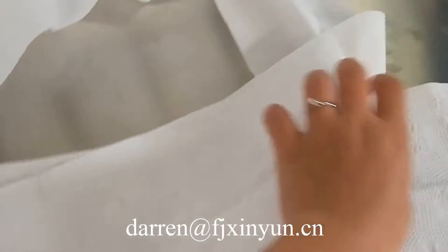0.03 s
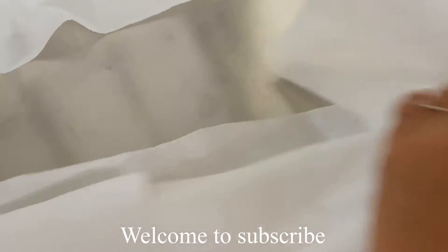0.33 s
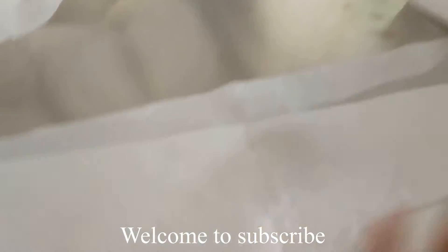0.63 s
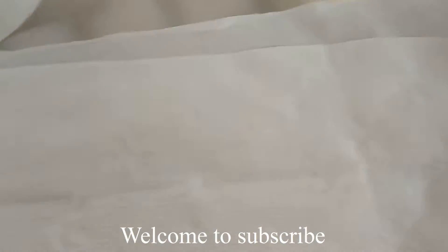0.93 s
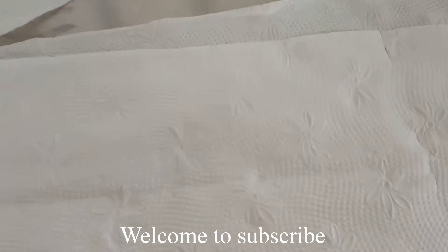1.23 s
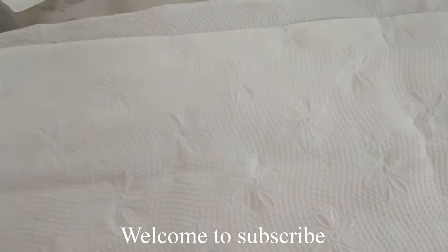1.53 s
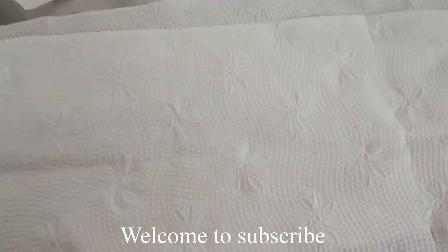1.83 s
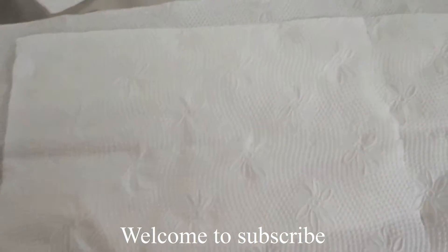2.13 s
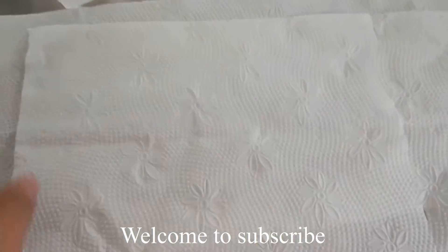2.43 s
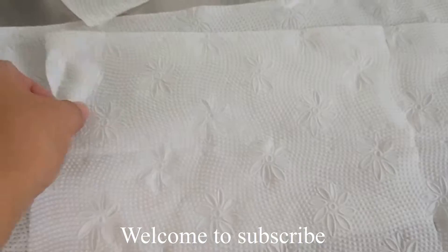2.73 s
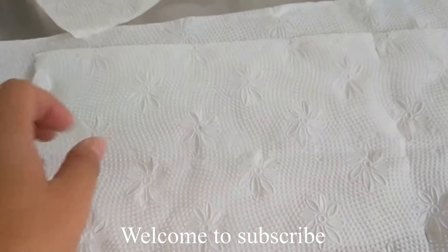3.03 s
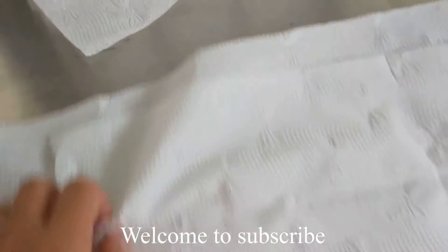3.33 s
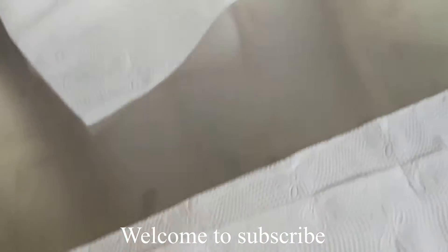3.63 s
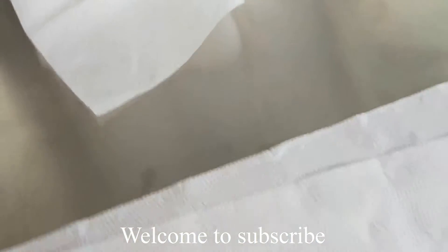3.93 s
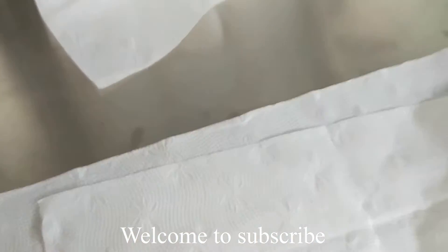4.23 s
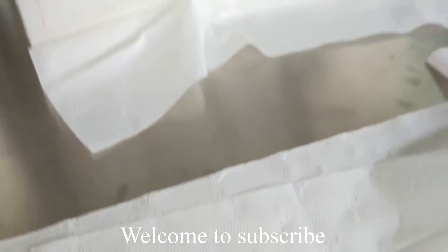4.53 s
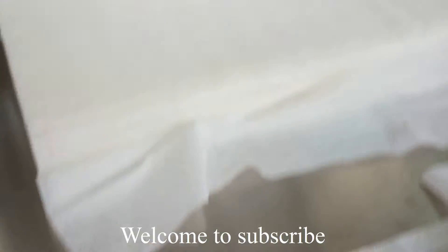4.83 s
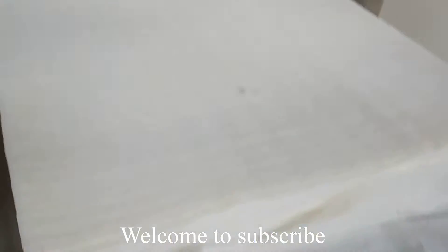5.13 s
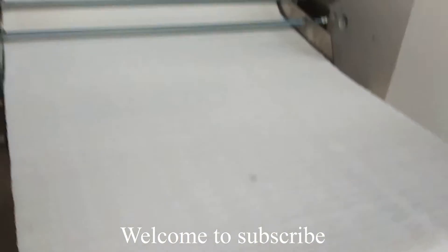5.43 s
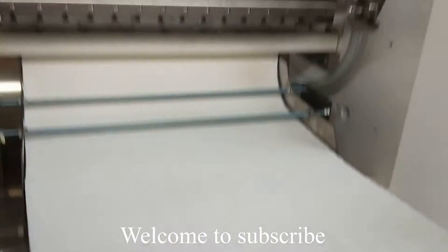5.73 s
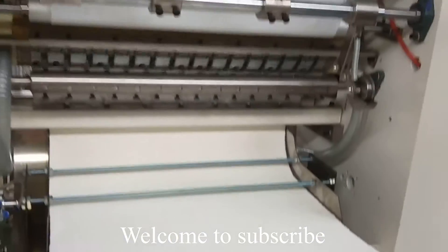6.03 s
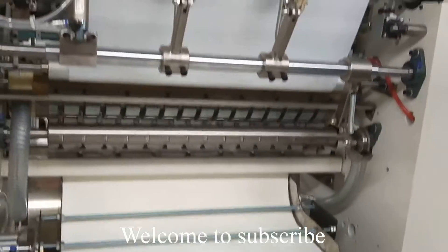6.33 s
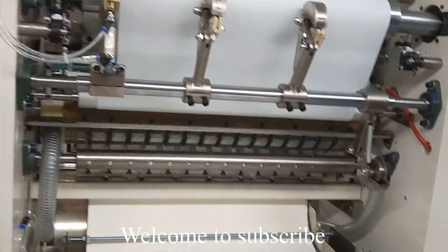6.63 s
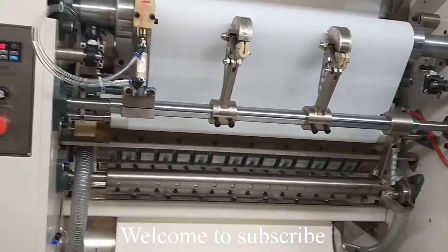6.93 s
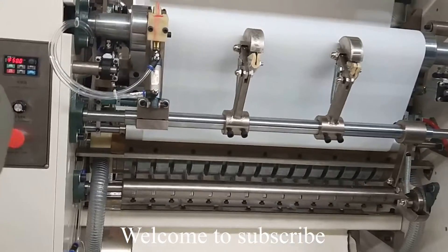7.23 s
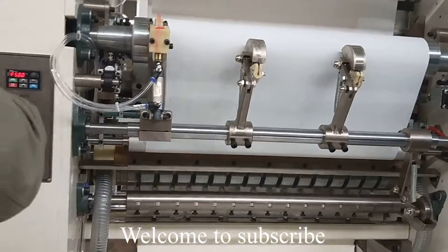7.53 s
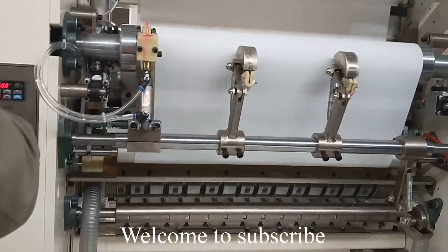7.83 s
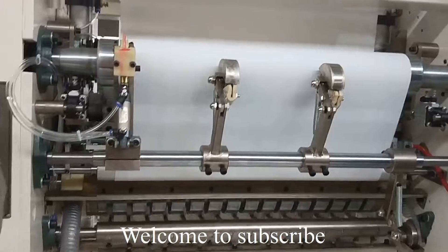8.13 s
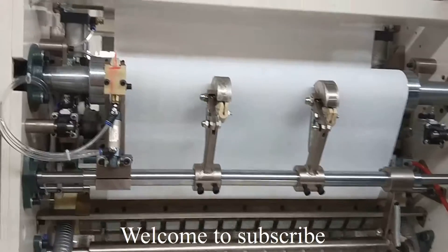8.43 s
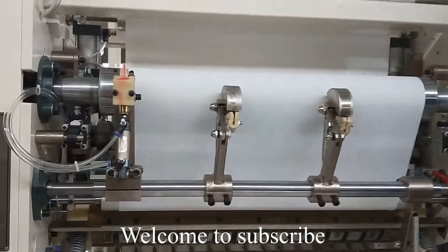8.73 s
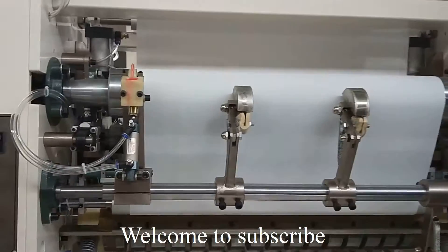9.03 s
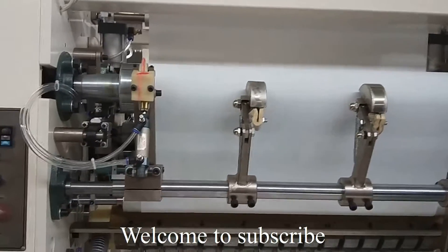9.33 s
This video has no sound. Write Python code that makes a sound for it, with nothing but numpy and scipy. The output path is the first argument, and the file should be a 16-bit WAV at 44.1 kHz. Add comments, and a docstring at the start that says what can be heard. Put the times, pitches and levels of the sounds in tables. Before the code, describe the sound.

A tissue folding machine runs steadily in a factory hall, its rollers giving rapid metal knocks and high pulsing squeals while paper slaps and drags in a slower rhythm. Hollow thuds and a low drone sit underneath. An air jet hisses on the left, then fades as the microphone moves from the paper stack to the rollers. There, ticks, brief scrapes and growing hiss and rustle take over.

```python
"""A tissue folding machine runs in a factory hall. From the start each roller turn gives two metal
knocks and a squeal, while a slower stroke slaps and drags the paper web and the frame thuds hollowly.
By 2.5 s the microphone is at the paper stack, an air jet hissing on the left. By 5.6 s it has moved
to the rollers, where the bracket ticks and the drag sounds lower. The jet then fades; brief scrapes
ring, and roller hiss and web rustle grow to the end."""
import sys
import numpy as np
from scipy import signal
from scipy.fft import rfft, irfft, next_fast_len
from scipy.io import wavfile
from scipy.ndimage import uniform_filter1d, map_coordinates

SR = 44100
rng = np.random.default_rng(int(sys.argv[2]) if len(sys.argv) > 2 else 0)


def generate_wav(sig):
    """Save sig (samples, or channels by samples) to the path in sys.argv[1] as 16-bit PCM at SR."""
    pcm = np.round(np.clip(np.atleast_2d(sig).T, -1, 1) * 32767).astype(np.int16)
    wavfile.write(sys.argv[1], SR, pcm)


N = 418068
TIME_S = np.arange(N) / SR
TURN_HZ = 8.945
CREST_S = 1 / 20  # start of a tone burst to its crest

# Hard rub: t/s, level/dB, L-R/dB
SQUEAL = [(0.1, -26.5, -31), (0.39, -17, -2), (0.62, -16, -4), (0.73, -22.5, -11), (0.84, -24.5, -16),
          (1.06, -18.5, -2), (1.18, -19, 2), (1.73, -23, 8), (1.92, -34, 0), (2.1, -16, 11),
          (2.41, -15.5, -4.5), (2.97, -21, 3), (3.08, -21.5, 3), (3.2, -16, 1), (3.63, -22.5, 5),
          (3.75, -15, -8), (3.97, -16, -5), (4.08, -14.5, -5), (4.2, -19, -4), (4.31, -25.5, -10),
          (4.72, -32, 8), (4.86, -24.5, 13), (4.98, -23.5, 10), (5.09, -18.5, 6), (5.2, -37, -7),
          (5.35, -14.5, 15), (5.54, -24, 1), (5.76, -18, -6), (5.98, -20, -3), (6.1, -15.5, 0),
          (6.43, -23, -6), (6.54, -23, -10), (6.77, -27, -11), (6.88, -22, 1), (6.99, -25.5, 2),
          (7.21, -22, 1), (7.44, -27, -8), (7.55, -24.5, -15), (7.7, -28.5, 0), (8, -30, 8),
          (8.33, -26.5, -10), (8.44, -19.5, -8), (8.55, -23.5, -10), (8.7, -15.5, -19), (8.89, -26.5, 1),
          (9, -22, -4), (9.11, -18, -4), (9.23, -21.5, -7), (9.45, -20.5, -2)]
# Light rubs: delay/s, level/dB re hard rub
LIGHT_RUBS = [(.034, -16.5), (.056, -7.5), (.08, -17)]
# Higher chirp: t/s, level/dB
CHIRP = [(0.04, -31), (0.49, -43), (1.16, -30.5), (1.72, -44), (2.16, -29), (3.2, -31.5), (4.1, -39.5),
         (4.96, -37), (5.97, -43), (7.3, -54), (7.6, -43), (9.32, -37)]
def squeals():
    """Each turn the roller chirps, rubs once hard, then three times lightly."""
    out = np.zeros((2, N))
    times = turns(first_s=.0595)
    for s, scatter in zip(times, rng.standard_normal((len(times), 5))):
        pitch, stretch, light_pitch, light_db, chirp_db = scatter
        db, pan_db = curves(SQUEAL, s)
        start_s = s - CREST_S
        width_s = .007 * np.exp(.08 * stretch)
        hard = tone_burst(5234 + 12 * pitch, width_s, overtone_db=-32, spread_rad=.83, glide_per_s=.49)
        add(out, start_s, amp(db) * sides(pan_db) * rough(hard, swing_db=.7))
        for delay_s, rub_db in LIGHT_RUBS:
            light = tone_burst(5230 + 26 * light_pitch, width_s=.0056, overtone_db=-28, spread_rad=1)
            add(out, start_s + delay_s, amp(db + rub_db + light_db) * sides(pan_db) * light)
        chirp = tone_burst(5722 + 15 * pitch, width_s=.0057, overtone_db=-52, spread_rad=.98)
        add(out, start_s - .02, amp(curve(CHIRP, s) + 1.5 + chirp_db) * sides(pan_db=37) * chirp)
    return out


# Lower knock: t/s, level/dB, L-R/dB
LOW_BLOWS = [(0.02, -21, 31), (1.25, -24.5, 0), (1.36, -25, -1), (1.48, -31, 10), (1.7, -27.5, 19),
             (2.03, -26.5, 0), (2.15, -20.5, 19), (4.4, -16.5, 6.5), (4.94, -22, 0), (5.5, -34, -3),
             (5.61, -28.5, -5), (9.41, -17.5, -9)]
# Resonances of the part and its bracket: f/Hz, width/Hz, level/dB
LOW_RING = [(1213, 68, 9.5), (1610, 200, -24.5)]
BRACKET_RING = [(2280, 29, -5), (3320, 260, -39), (1640, 480, -12)]
NEAR_LEAD_S = .0026  # knocks arrive sooner at the rollers
def low_knocks():
    """A metal part strikes and rebounds once a turn; close by, its bracket rings too."""
    blows, t = np.zeros((2, N)), np.arange(SR // 10) / SR
    blow = (1 - np.exp(-(t / .007) ** 2)) * np.exp(-t / .0054)
    for s in turns(first_s=.022):
        db, pan_db = curves(LOW_BLOWS, s)
        hit = amp(db + 2.5 * rng.standard_normal()) * sides(pan_db) * blow
        arrival_s = s - NEAR_LEAD_S * nearness(s)
        add(blows, arrival_s, hit)
        add(blows, arrival_s + .017, .1 * hit)
    bracket = amp(-14.5 + 17.5 * nearness()) * even(ringing(BRACKET_RING, apart=.75))
    part = amp(6.5 + 3.4 * nearness()) * even(ringing(LOW_RING, apart=.68))
    return blows * (part + bracket)


# Higher knock: t/s, level/dB, L-R/dB
HIGH_BLOWS = [(0.08, -25, 9), (1.98, -28.5, -2), (2.09, -25, -18), (2.2, -38, -14), (2.65, -23.5, 16),
              (4.66, -28, 2), (4.89, -64, -2), (5.11, -33, 14), (6.23, -37, -27), (6.34, -27, -19),
              (6.68, -27.5, -15), (6.92, -26, -10), (7.13, -21.5, -3), (7.24, -33, -2), (7.35, -23, -10),
              (7.8, -22.5, -7), (8.13, -18.5, -6), (8.24, -23, -10), (8.6, -17, -5), (9.36, -27, -10)]
# Steel part: f/Hz, level/dB, t60/s
HIGH_MODES = [(1873, 1, 0.044), (3774, -23.5, 0.043)]
# Blow and rebounds: delay/s, level/dB
CHATTER = [(0, 0), (0.009, 0.5), (0.024, -7.5)]
# Clinks: t/s, level/dB, L-R/dB
CLINKS = [(6.727, -23.5, -22), (6.932, -20.5, -30), (7.687, -52, 20), (8.539, -21.5, -21), (8.743, -21, -4),
          (8.942, -24.5, -4)]
def high_knocks():
    """A small steel part chatters on its stop once a turn and clinks when a stroke catches it."""
    out = np.zeros((2, N))
    for s in turns(first_s=.081):
        db, pan_db = curves(HIGH_BLOWS, s)
        near = nearness(s)
        for delay_s, hit_db in CHATTER:
            ring = rough(struck(HIGH_MODES, attack_s=.0045, spread_rad=.8, detune=.012))
            arrival_s = s + delay_s * (1 + .16 * rng.standard_normal()) - NEAR_LEAD_S * near
            add(out, arrival_s, amp(db + hit_db + 5 + .5 * near) * sides(pan_db) * ring)
    for s, db, pan_db in CLINKS:
        clink = tone_burst(HIGH_MODES[0][0], width_s=.004, overtone_db=-28, spread_rad=.6)
        add(out, s - CREST_S, amp(db) * sides(pan_db) * clink)
    return out


# Struck bracket: f/Hz, level/dB, t60/s
BRACKET_MODES = [(2333, -0.5, 0.036), (3660, -35, 0.017)]
def ticks(blows, first_s, gain_db):
    """Each knock ticks the bracket, audible close to the rollers."""
    out = np.zeros((2, N))
    for s in turns(first_s):
        db, pan_db = curves(blows, s)
        tick = struck(BRACKET_MODES, attack_s=.002, spread_rad=.6, detune=.008)
        add(out, s, amp(db + gain_db - 33 * (1 - nearness(s))) * sides(pan_db) * tick)
    return out


def metal(lag_s=.0001):
    """Both knocks, reaching the left ear lag_s after the right, plus their ticks."""
    delay_s = np.array([[.5], [-.5]]) * lag_s
    knocks = filtered(low_knocks() + high_knocks(), lambda hz: np.exp(-2j * np.pi * hz * delay_s))
    low_ticks = ticks(LOW_BLOWS, first_s=.0236, gain_db=-2)
    high_ticks = ticks(HIGH_BLOWS, first_s=.079, gain_db=5.5)
    return knocks + low_ticks + high_ticks


# Folding strokes, five a second: t/s, slap/dB, drag/dB, edge/dB
STROKES = [(0.074, -17, -27, -21), (0.276, -31, -29, -23), (0.478, -17, -31, -15), (0.68, -33.0, -34, -21),
           (0.881, -23.5, -36, -20), (1.083, -17.5, -27, -15), (1.285, -29, -28.5, -18.5),
           (1.487, -26.5, -48, -20), (1.689, -21.5, -45, -16), (1.891, -23.5, -35, -24.5),
           (2.092, -18.5, -39, -18.5), (2.294, -21, -42, -23.5), (2.496, -20, -32, -20.5),
           (2.698, -25, -36.5, -22.5), (2.9, -23, -38, -23.5), (3.102, -21, -31.5, -24.0),
           (3.304, -18.5, -43, -21.5), (3.505, -19, -35, -22), (3.707, -18.5, -24, -16.5),
           (3.909, -18, -29, -17.5), (4.111, -20.5, -46, -18.5), (4.313, -21.5, -29, -21),
           (4.515, -22.5, -34.5, -25), (4.717, -26, -50, -33), (4.918, -21, -35.5, -31),
           (5.12, -19, -26.5, -23), (5.322, -20, -28, -24.5), (5.524, -14, -32, -22.5),
           (5.726, -16, -29.5, -21), (5.928, -15.5, -35, -22.5), (6.13, -21.5, -31.5, -26.5),
           (6.331, -22.5, -25, -24), (6.533, -40, -29, -25), (6.735, -40.0, -24, -27),
           (6.937, -45, -27.5, -27), (7.139, -52.0, -28.5, -35), (7.341, -40.0, -28, -24),
           (7.542, -26, -29.5, -23), (7.744, -26, -29, -18.5), (7.946, -20.5, -21.5, -24),
           (8.148, -28, -31.5, -43), (8.35, -33, -33.5, -32), (8.552, -32, -26.5, -28.5),
           (8.754, -28, -34, -31), (8.955, -28.5, -44, -41), (9.157, -20.5, -31.5, -18.5),
           (9.359, -22, -23.5, -26)]
# Paper position: t/s, body L-R/dB, crisp L-R/dB
PAPER_PAN = [(0, -13, 5), (.6, 7.5, -3), (2.3, -1.5, -7.5), (3.2, 12, -0.5), (3.9, -6, 0), (4.6, 14, 2.5),
             (5, -1.5, 2), (5.9, -2.5, -9), (6.35, 11, 15), (7, -5, 3), (7.5, 5, 7), (9.1, -6, 7.5)]
# Slap and drag resonances, heard at stack and rollers: f/Hz, width/Hz, level/dB
STACK_SLAP = [(288, 63, -24), (667, 25, -1), (1004, 48, 1.5), (1182, 155, 22), (1740, 77, -9),
              (1040, 2200, -14)]
NEAR_SLAP = [(689, 67, -1), (921, 120, 5.5), (1170, 140, -1), (1542, 85, -3), (1100, 900, -22)]
STACK_DRAG = [(725, 46, -32), (867, 67, 0.5), (992, 60, 8.5), (1120, 30, 2), (1750, 71, 0), (2820, 200, -6),
              (1100, 2000, -28)]
NEAR_DRAG = [(416, 66, -0.5), (528, 120, 4), (660, 116, 16.5), (815, 43, 12.5), (1310, 46, -7),
             (3300, 19, -11), (1300, 5300, -25)]
# Crisp paper edge: f/Hz, density/dB
EDGE_SPECTRUM = [(900, -13.5), (1400, -10), (1700, 4.5), (1860, 9.5), (2100, -2), (2340, -10), (2600, -5.5),
                 (2900, -3), (3120, -30), (3350, -12), (4200, -26.5), (7000, -26), (12000, -46)]
def folds():
    """Each stroke draws the flapping web in, slaps it down and drags it over the stack."""
    slap, drag, edge = np.zeros((3, N))
    lead_s = .1
    t = np.arange(SR // 3) / SR - lead_s
    blow = lambda decay_s: np.exp(-np.maximum(t, 0) / decay_s) / (1 + np.exp(-t / .0073))
    for s, slap_db, drag_db, edge_db in STROKES:
        near = nearness(s)
        draw = amp(-40.5 - .5 * near) * swell(t + .068, width_s=.024)
        slide = amp(drag_db) * swell(t - .043 + .0023 * near, width_s=.018)
        add(slap, s - lead_s, amp(slap_db) * blow(decay_s=.007))
        add(drag, s - lead_s, draw + slide)
        add(edge, s - lead_s, amp(edge_db) * (blow(decay_s=.018) + .16 * swell(t + .022, width_s=.0089)))
    at_stack, at_rollers = np.sqrt(1 - nearness()), np.sqrt(nearness())
    drag_ring = at_stack * ringing(STACK_DRAG, apart=1, grain_db=4.5)
    drag_ring += at_rollers * ringing(NEAR_DRAG, apart=.74, grain_db=11)
    slap_ring = at_stack * ringing(STACK_SLAP, apart=1) + at_rollers * ringing(NEAR_SLAP, apart=1)
    body_pan_db, crisp_pan_db = curves(PAPER_PAN)
    body = sides(body_pan_db) * (slap * even(slap_ring) + drag * even(drag_ring))
    crisp = sides(crisp_pan_db) * edge * noise(EDGE_SPECTRUM, alike=.015, grain_db=2, patchy_db=10.5)
    flutter = unit(amp(2.2 * wobble(130)))
    return flutter * (body + crisp)


# Feed table and its steel sheets: f/Hz, level/dB, t60/s
TABLE_MODES = [(923, -0.5, 0.044), (840, -5, 0.028), (651, -21, 0.2), (1360, -10, 0.12)]
SHEET_MODES = [(915, 0, 0.26), (982, 0, 0.3), (1620, -10, 0.18), (1885, -7, 0.24)]
def feed_table():
    """Table and sheets ring on after each slap; the shifting pile detunes them."""
    out = np.zeros((2, N))
    for s, slap_db, drag_db, _ in STROKES:
        near = nearness(s)
        pan_db, _ = curves(PAPER_PAN, s)
        table = struck(TABLE_MODES, attack_s=.017, spread_rad=.75, detune=.035)
        sheets = rough(struck(SHEET_MODES, attack_s=.006, spread_rad=.7, detune=.012))
        ring = amp(drag_db + 1 + 6.5 * near) * table + amp(slap_db - 14 + 1.5 * near) * sheets
        add(out, s, sides(pan_db) * ring)
    return out


# Feed table notes: t/s, level/dB, f/Hz, length/s
HOLLOW_NOTES = [(1.135, -24, 920, 0.017), (1.301, -28, 985, 0.022), (1.335, -27.5, 865, 0.015),
                (3.922, -21.5, 930, 0.016), (3.94, -23, 1156, 0.0076), (3.96, -24.5, 972, 0.012),
                (4.083, -26, 1140, 0.01), (5.743, -25.5, 945, 0.022), (5.871, -34, 1393, 0.04),
                (6.063, -38, 1407, 0.016), (6.47, -26.5, 740, 0.0096), (6.576, -41, 642, 0.03),
                (6.776, -28.5, 660, 0.027), (6.984, -26.5, 634, 0.014), (7.203, -31, 673, 0.019),
                (7.481, -28.5, 640, 0.017), (8.657, -30, 630, 0.014), (8.99, -31, 820, 0.012),
                (9.102, -29, 583, 0.011), (9.195, -28, 847, 0.025)]
def hollow_notes():
    """The table's sheet metal answers the web with short hollow notes."""
    out = np.zeros((2, N))
    for s, db, hz, length_s in HOLLOW_NOTES:
        note = tone_burst(hz, width_s=length_s / 2, overtone_db=-20, spread_rad=.77)
        add(out, s - CREST_S, amp(db) * rough(note))
    return out


# Cover thuds: t/s, level/dB, f/Hz, L-R/dB
THUDS = [(1.012, -18.5, 374, -8), (1.148, -17.5, 347, -14), (1.183, -19, 337, -10), (1.29, -26, 314, -10),
         (1.314, -23, 340, -18), (1.373, -20.5, 358, -10), (1.474, -11, 334, -3.5), (2.082, -19, 340, -11),
         (2.105, -12.5, 259, -6), (2.3, -14, 318, -25), (2.423, -19, 328, -20), (2.445, -12, 328, -12),
         (2.519, -19, 302, -8), (2.702, -14, 320, -5), (2.714, -21, 225, -3), (2.785, -21.5, 337, -10),
         (2.826, -22.5, 364, -13), (3.598, -17, 313, -3), (4.066, -18, 344, -20), (4.492, -14, 321, -16),
         (4.654, -26, 510, 0), (4.695, -14.5, 337, -2), (4.735, -21, 311, -1), (4.899, -23.5, 393, -14),
         (4.926, -19, 286, -11), (5.983, -18.5, 349, -10), (6.865, -18.5, 320, -18), (7.093, -16, 365, -15),
         (7.405, -13, 348, -21), (7.859, -14.5, 337, -32), (7.946, -16, 371, -3), (8.572, -17, 408, -28),
         (9.21, -20.5, 376, -18), (9.275, -18, 389, -28), (9.323, -17, 371, -21)]
def cover_thuds():
    """The hollow covers boom for a few cycles and ring on."""
    out = np.zeros((2, N))
    for s, db, hz, pan_db in THUDS:
        boom = tone_burst(hz, width_s=.0085, overtone_db=-28, spread_rad=.5, glide_per_s=-1.5)
        add(out, s - CREST_S, amp(db - 7) * sides(pan_db) * rough(boom, swing_db=3))
        tail = struck([(hz, 0, .24)], attack_s=.004, spread_rad=.4, detune=.045)
        add(out, s + .00794, amp(db - 12.5) * sides(pan_db) * rough(tail))
    return out


# Heavy thumps: t/s, level/dB, L-R/dB
HEAVY_THUMPS = [(0.877, -26.5, 15), (3.197, -25, 12), (3.806, -23, -1), (4.009, -22.5, 0), (4.412, -21, 3),
                (5.002, -26, 12), (5.612, -22, -6), (5.815, -16.5, 1), (6.026, -20.5, -4), (6.615, -29, 9)]
# Frame: f/Hz, level/dB, t60/s
FRAME_MODES = [(184.5, 2, 0.15), (220, 1, 0.092)]
def frame_thumps(delay_s=.093):
    """The frame thumps softly after each stroke, and now and then heavily."""
    out = np.zeros((2, N))
    soft_thumps = [(s + delay_s, -46.5 - 8.5 * nearness(s), 0) for s, *_ in STROKES]
    for s, db, pan_db in HEAVY_THUMPS + soft_thumps:
        hz = 183.5 + 4 * rng.standard_normal()
        boom = tone_burst(hz, width_s=.0092, overtone_db=-39, spread_rad=.15, glide_per_s=-2)
        tail = struck(FRAME_MODES, attack_s=.0044, spread_rad=.2, detune=.065)
        add(out, s - CREST_S, amp(db) * sides(pan_db) * boom)
        add(out, s, amp(db - 4.5) * sides(pan_db) * tail)
    return out


# Scrapes: t/s, level/dB, length/s
SCRAPES = [(6.373, -37, 0.039), (6.471, -33, 0.032), (6.71, -38, 0.04), (7.04, -39, 0.049),
           (7.154, -43, 0.023), (7.793, -36, 0.041), (8.037, -35, 0.037), (8.184, -38.5, 0.08),
           (8.382, -33.5, 0.015), (8.722, -35.5, 0.069), (8.83, -34, 0.047), (8.913, -37, 0.053),
           (9.152, -29, 0.023), (9.402, -31.5, 0.046)]
# Scrape resonances: f/Hz, width/Hz, level/dB
SCRAPE_RING = [(3040, 740, 4), (3270, 60, 13.5)]
def scrapes():
    """Something brushes the rollers and rings briefly."""
    contact = sum(amp(db) * swell(TIME_S - s, length_s / 2) for s, db, length_s in SCRAPES)
    return contact * ringing(SCRAPE_RING, apart=1, grain_db=-1.5)


# Spits: t/s, level/dB, decay/s, L-R/dB
SPITS = [(4.114, -28, 0.018, 23), (4.535, -32, 0.026, 23), (6.131, -41, 0.012, 10),
         (6.529, -24.5, 0.049, 18), (6.927, -27, 0.02, 8), (6.955, -42, 0.016, -3), (7.125, -29, 0.02, 7),
         (7.335, -33, .012, 10), (7.737, -39, 0.0095, 6.5), (8.13, -35, 0.016, 8), (8.379, -22, 0.03, 10),
         (8.725, -21, .016, 11), (8.945, -25, 0.014, 3), (9.05, -22, 0.026, 5), (9.148, -23, 0.029, 7)]
# Spit body and bright top: f/Hz, density/dB
SPIT_SPECTRUM = [(1000, -19), (3000, 13), (4300, 3.5), (5500, 27), (7000, 21), (8000, 26), (9000, -41),
                 (15000, -45)]
SPIT_TOP_SPECTRUM = [(6000, -22), (8000, 7), (10500, -10), (14000, -6), (15700, -14)]
def spits(attack_s=.0025):
    """Air and paper spit in short bursts, brighter at the stack."""
    envelope, t = np.zeros((2, N)), np.arange(SR // 5) / SR
    for s, db, decay_s, pan_db in SPITS:
        add(envelope, s, amp(db) * sides(pan_db) * (1 - np.exp(-t / attack_s)) * np.exp(-t / decay_s))
    top = amp(14) * (1 - nearness()) * noise(SPIT_TOP_SPECTRUM, alike=.15)
    return envelope * (noise(SPIT_SPECTRUM, alike=.15, grain_db=-2.5) + top)


# Air jet: t/s, hiss/dB, whistle/dB
JET_LEVELS = [(0, -34, -33.5), (.8, -29, -31), (1.6, -28, -27), (2.8, -29, -34.5), (3.6, -27.5, -29),
              (4.5, -29.5, -37), (5.4, -33, -28.5), (6.1, -40.5, -33), (7.05, -50.5, -31.5),
              (7.35, -55, -42), (8.1, -112, -47), (9.48, -71, -41)]
# Hiss and whistle: f/Hz, density/dB
JET_SPECTRUM = [(5000, -63), (6700, -62), (7500, 8), (8600, 7), (9500, 1.5), (10500, 5), (11500, -7),
                (13000, -10.5), (15700, -12)]
WHISTLE_SPECTRUM = [(6500, -71), (7000, 11), (7220, -4), (7423, 17.5), (7540, -45), (7660, 7), (7790, 16),
                    (7960, 18), (8200, 13), (8600, -15), (10000, -52)]
def air_jet():
    """A jet hisses on the left and whistles on an edge; both waver with the flow."""
    hiss_db, whistle_db = curves(JET_LEVELS)
    flow = wobble(28)
    hiss = amp(hiss_db + flow) * noise(JET_SPECTRUM, alike=.092, patchy_db=5)
    whistle_db += .38 * flow + 1.8 * wobble(60)
    whistle = amp(whistle_db) * noise(WHISTLE_SPECTRUM, alike=.05, patchy_db=5.5)
    return sides(pan_db=35) * hiss + sides(pan_db=26.5) * whistle


# Roller air: t/s, level/dB
ROLLER_AIR_LEVEL = [(0, -44), (.8, -44), (1.6, -41), (2.8, -55), (3.9, -45), (5.1, -54), (6, -44),
                    (7.2, -36), (8, -35.5), (8.8, -30), (9.48, -27.5)]
# Roller air: f/Hz, density/dB
ROLLER_AIR_SPECTRUM = [(3000, -45), (4400, -64), (5000, 16), (5400, 26), (5750, 26.5), (6200, 25),
                       (6700, 20), (7100, 23), (8200, -69), (9500, -112), (13000, -107), (14500, -15),
                       (15800, -50)]
def roller_air(puff_db=5, sharpness=12):
    """Air rushes round the rollers, puffing once a turn."""
    puff = np.exp(sharpness * (turn_wave(crest_s=-.001) - 1))
    db = curve(ROLLER_AIR_LEVEL) + puff_db * puff + 1.2 * wobble(45)
    hiss = noise(ROLLER_AIR_SPECTRUM, alike=.036, grain_db=2.1, patchy_db=5)
    return amp(db) * sides(pan_db=12.5) * hiss


# Roller resonances: f/Hz, width/Hz, level/dB
ROLLER_RING = [(5260, 100, 8.5), (5720, 50, 4)]
def roller_ring():
    """The rubbing roller keeps ringing faintly between squeals."""
    db = curve(CHIRP) - 3.5 + 3.3 * wobble(55)
    return amp(db) * sides(pan_db=10) * ringing(ROLLER_RING, apart=5.8)


# Web rustle: t/s, level/dB
RUSTLE_LEVEL = [(0, -49), (1.9, -44), (3.1, -53.5), (4.4, -46), (6.1, -52.5), (7.3, -38.5), (8.2, -38.5),
                (9.48, -33.5)]
# Web rustle: f/Hz, density/dB
RUSTLE_SPECTRUM = [(600, 0), (1200, -18), (1500, 10), (1870, -31), (2100, 19), (2400, 20), (2620, 1),
                   (2900, 13.5), (3300, 12.5), (3800, 4.5), (4200, -8.5), (4500, 3.5), (6000, -17.5)]
def web_rustle():
    """The moving web rustles, swelling once a turn."""
    paper = noise(RUSTLE_SPECTRUM, alike=.1, grain_db=1, patchy_db=6.5)
    db = curve(RUSTLE_LEVEL) + 2 * turn_wave(crest_s=.002) + 3.5 * wobble(50)
    _, pan_db = curves(PAPER_PAN)
    return amp(db) * sides(pan_db) * paper


# Cover boom: t/s, level/dB
COVER_LEVEL = [(0, -45), (.6, -42.5), (1.15, -35), (1.7, -43), (2.08, -37), (2.22, -44.5), (2.35, -30),
               (2.8, -35), (3.3, -45), (4.2, -39), (4.6, -38), (4.8, -53), (6.5, -44), (7.3, -37),
               (8.2, -39.5), (9.3, -41)]
# Cover resonances: f/Hz, width/Hz, level/dB
COVER_RING = [(337, 58, 1.5), (297, 35, -6), (422, 37, -16)]
def cover_boom():
    """The covers resonate unevenly between thuds."""
    db = curve(COVER_LEVEL) + 3.5 * np.minimum(wobble(30), 1)
    return amp(db) * sides(pan_db=-9.5) * ringing(COVER_RING, apart=.11)


# Drive: t/s, level/dB
DRONE_LEVEL = [(0, -39.5), (3, -39.5), (5.8, -39.5), (7.3, -42), (8.6, -43), (9.48, -39.5)]
# Drive: f/Hz, density/dB
DRONE_SPECTRUM = [(20, -11), (45, -12.5), (100, -1), (150, 1.5), (183, 9), (235, -0.5), (345, -5),
                  (470, -2), (650, -11.5), (790, -14), (980, -28), (1500, -14), (2500, -32), (4000, -77)]
def drive_drone():
    """The drive drones through the frame."""
    return noise(DRONE_SPECTRUM, alike=.92, patchy_db=3.5) * amp(curve(DRONE_LEVEL) + wobble(25))


# Treble hiss: t/s, level/dB
TREBLE_HISS_LEVEL = [(0, -45), (.8, -50), (1.2, -47), (4.2, -47), (5.5, -51), (6.7, -44), (7.3, -49),
                     (8, -59), (9.48, -64)]
# Treble hiss: f/Hz, density/dB
TREBLE_HISS_SPECTRUM = [(9000, -44), (10300, -42), (11200, -52), (13000, 9), (14500, 26), (15700, 21)]
def treble_hiss():
    """A faint, fine hiss in the top treble, its level wavering at random."""
    db = curve(TREBLE_HISS_LEVEL) + 4 * wobble(27)
    return amp(db) * sides(pan_db=7) * noise(TREBLE_HISS_SPECTRUM, alike=.1, patchy_db=6)


# Hall decay: f/Hz, t60/s
HALL_T60 = [(150, 0.99), (1500, 0.3), (5000, 0.33), (12000, 0.1)]
def hall(x):
    """Reverberation, each frequency dying at its own rate."""
    hz, t, bands = signal.stft(rng.standard_normal((2, SR // 3)), SR, nperseg=256)
    tail = signal.istft(bands * amp(-60 * t / along(HALL_T60, hz)[:, None]), SR, nperseg=256)[1]
    response = np.pad(tail, ((0, 0), (SR // 150, 0))) / np.linalg.norm(tail[0])
    return signal.fftconvolve(x, response, axes=1)[:, :N]


# Microphone path: t/s, nearness/0-1
MIC_PATH = [(0, 0.62), (2.5, 0.1), (4.6, 0.54), (5.6, 1), (6.5, 0.95), (7.5, 0.94), (9.48, 1)]
def nearness(at_s=TIME_S):
    """0 at the stack, 1 at the rollers."""
    return curve(MIC_PATH, at_s)


def turns(first_s):
    """One time per roller turn."""
    return np.arange(first_s, N / SR, 1 / TURN_HZ)


def turn_wave(crest_s):
    """Cosine at the roller rate."""
    return np.cos(2 * np.pi * TURN_HZ * (TIME_S - crest_s))


def tone_burst(hz, width_s, overtone_db, spread_rad, glide_per_s=0):
    """A resonance swells and fades within 0.1 s; glide is relative, spread is phase scatter per ear."""
    t = np.arange(SR // 10) / SR - CREST_S
    cycles = hz * (t + glide_per_s * t * t / 2) + rng.random()
    phase = 2 * np.pi * cycles + spread_rad * rng.standard_normal((2, 1))
    return np.sqrt(2) * swell(t, width_s) * (np.sin(phase) + amp(overtone_db) * np.sin(2 * phase))


def struck(modes, attack_s, spread_rad, detune):
    """0.25 s of modes decaying after one blow, scattered in pitch and level."""
    t = np.arange(SR // 4) / SR
    ring = np.zeros((2, len(t)))
    for hz, db, t60_s in modes:
        pitch_hz = hz * (1 + detune * rng.standard_normal())
        phase = 2 * np.pi * (pitch_hz * t + rng.random()) + spread_rad * rng.standard_normal((2, 1))
        ring += amp(db + 2 * rng.standard_normal() - 60 * t / t60_s) * np.sin(phase)
    return ring * (1 - np.exp(-t / attack_s))


def rough(tone, swing_db=4, catch_hz=193, slip_cycles=.053):
    """Uneven contact makes a tone flutter in level and pitch."""
    at = np.arange(tone.shape[-1]) * catch_hz / SR
    level, slip = (map_coordinates(knots, [at], mode="mirror") for knots in rng.standard_normal((2, 64)))
    return np.real(signal.hilbert(tone) * amp(swing_db * level) * np.exp(2j * np.pi * slip_cycles * slip))


def ringing(modes, apart, grain_db=0):
    """Resonances driven by random contact, rms 1; apart sets how unlike the ears are."""
    contact = rng.standard_normal(N) + apart * rng.standard_normal((2, N))
    contact *= amp(grain_db * wobble(900))
    peaks = lambda f: sum(amp(db) / (1 + ((f - hz) / width) ** 2) ** 1.8 for hz, width, db in modes)
    return unit(filtered(contact, peaks))


def even(ring):
    """Level out a ring, so that the blows shape it."""
    power = uniform_filter1d(np.mean(ring ** 2, axis=0), size=SR // 250)
    return ring / np.sqrt(np.abs(power) + .05)


def noise(spectrum, alike, grain_db=0, patchy_db=0):
    """Coloured stereo noise, rms 1; alike is L/R correlation, grain breaks it into tiny contacts."""
    mid, side = rng.standard_normal((2, N)) * amp(grain_db * wobble(900))
    angle = np.arccos(alike) / 2
    pair = np.cos(angle) * mid + np.sin(angle) * np.array([side, -side])
    return unit(filtered(patchy(pair, patchy_db), lambda hz: amp(along(spectrum, hz))))


def patchy(x, depth_db):
    """Flicker from brief patches of random gain, a few hundred Hz wide."""
    bands = signal.stft(x, nperseg=512)[2]
    field = uniform_filter1d(rng.standard_normal(bands.shape[1:]), size=3, axis=0)
    field = unit(uniform_filter1d(field, size=4, axis=1))
    return signal.istft(bands * amp(depth_db * np.minimum(field, 1.5)), nperseg=512)[1][:, :N]


def filtered(x, response):
    """Apply a frequency response."""
    size = next_fast_len(N + 8192)
    return irfft(rfft(x, size) * response(np.fft.rfftfreq(size, 1 / SR)), size)[..., :N]


def wobble(rate_hz):
    """Smooth random curve."""
    knots = rng.standard_normal(int(N * rate_hz / SR) + 4)
    return map_coordinates(knots, [np.arange(N) * rate_hz / SR])


def swell(t, width_s):
    """Gaussian around t = 0."""
    return np.exp(-.5 * (t / width_s) ** 2)


def curves(rows, at_s=TIME_S):
    """Each value column, interpolated in time."""
    s, *columns = np.transpose(rows)
    return [np.interp(at_s, s, column) for column in columns]


def curve(rows, at_s=TIME_S):
    """First value column, interpolated in time."""
    return curves(rows, at_s)[0]


def along(points, hz):
    """Interpolate on a log frequency axis."""
    f, values = np.transpose(points)
    return np.interp(np.log(hz + 1), np.log(f + 1), values)


def sides(pan_db):
    """Left and right gains of mean power 1; positive is left."""
    gains = amp(np.array([pan_db, -pan_db]).reshape(2, -1) / 2)
    return gains / np.sqrt(np.mean(gains ** 2, axis=0))


def amp(db):
    """Decibels to gain."""
    return 10 ** (np.asarray(db) / 20)


def unit(x):
    """Scale to rms 1."""
    return x / np.sqrt(np.mean(x ** 2) + 1e-20)


def add(track, start_s, sound):
    """Mix a sound into a track."""
    start = round(start_s * SR)
    first, end = max(start, 0), min(start + sound.shape[-1], N)
    if end > first:
        track[..., first:end] += sound[..., first - start:end - start]


def scene():
    """Moving parts in the hall, over hiss and running noise."""
    parts = metal() + folds() + feed_table() + hollow_notes() + scrapes()
    whine = squeals()
    reverb = hall(amp(-9.5) * parts + amp(-12.5) * whine)
    resonances = frame_thumps() + cover_thuds() + roller_ring()
    hiss = air_jet() + roller_air() + treble_hiss() + spits()
    running = drive_drone() + cover_boom() + web_rustle()
    return parts + whine + reverb + resonances + hiss + running


def record(dry):
    """Brick-wall low-pass at 15830 Hz."""
    return filtered(dry, lambda hz: hz < 15830)


dry = scene()
out = record(dry)
generate_wav(out)
```